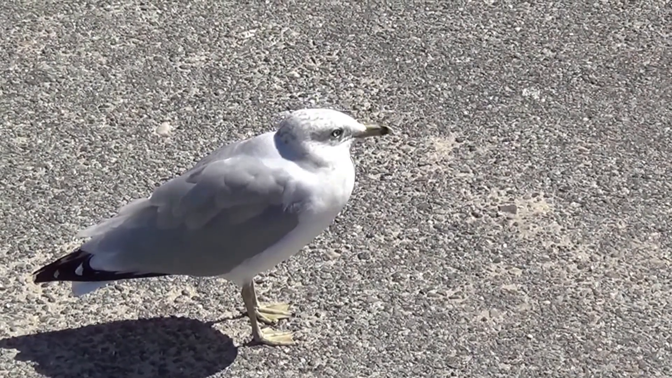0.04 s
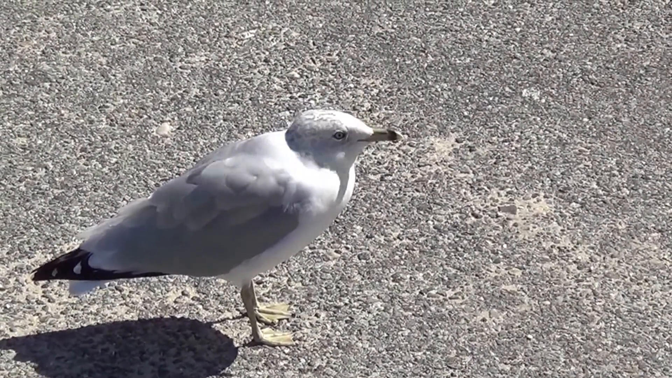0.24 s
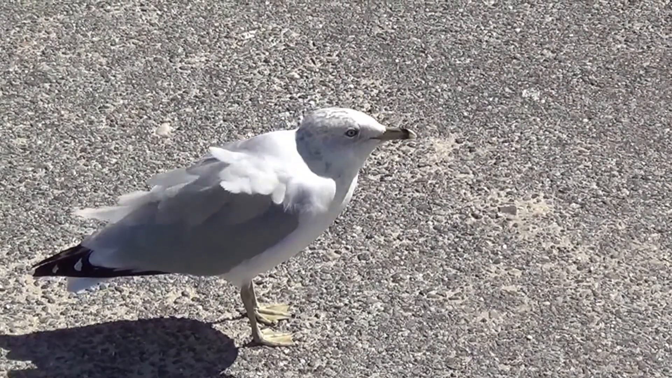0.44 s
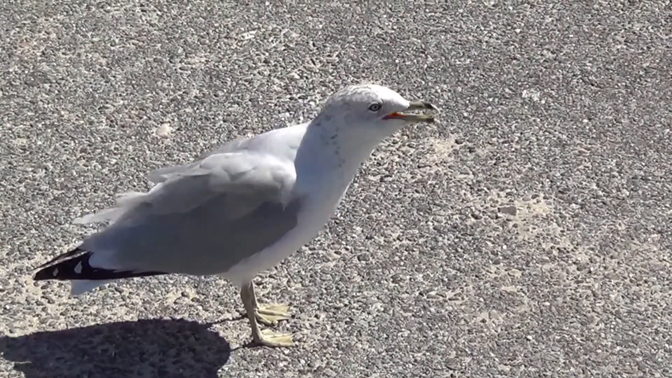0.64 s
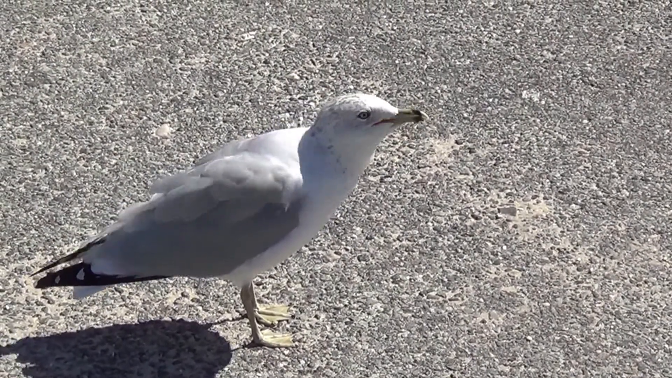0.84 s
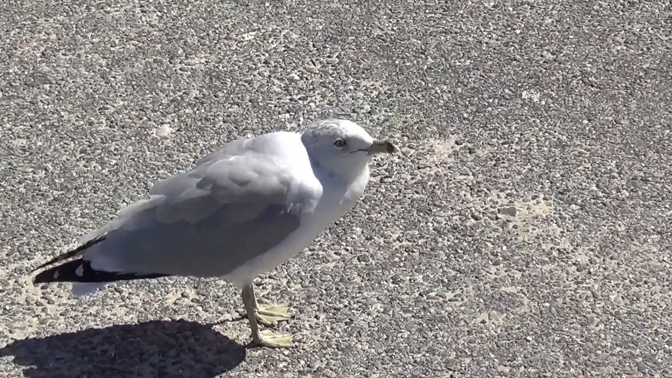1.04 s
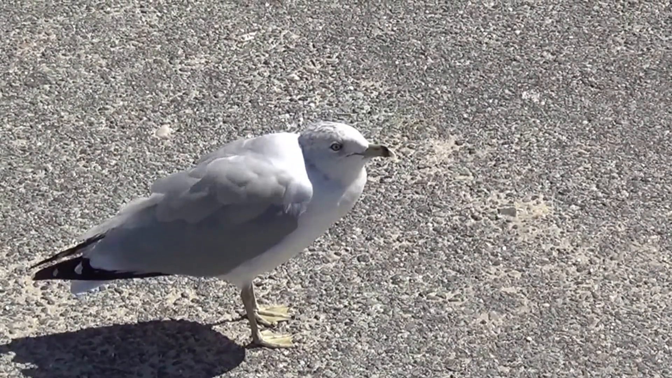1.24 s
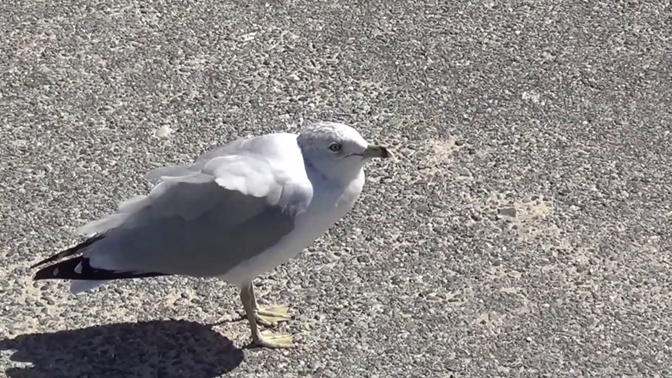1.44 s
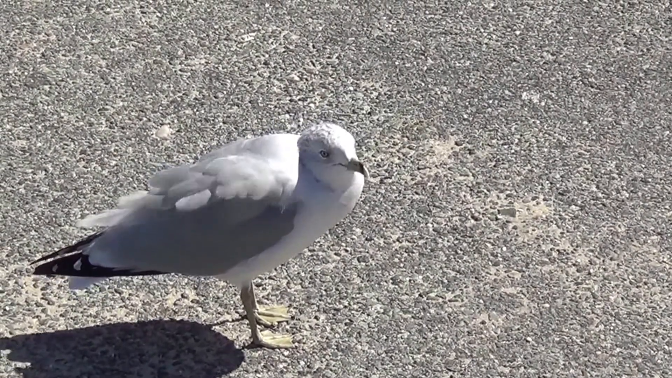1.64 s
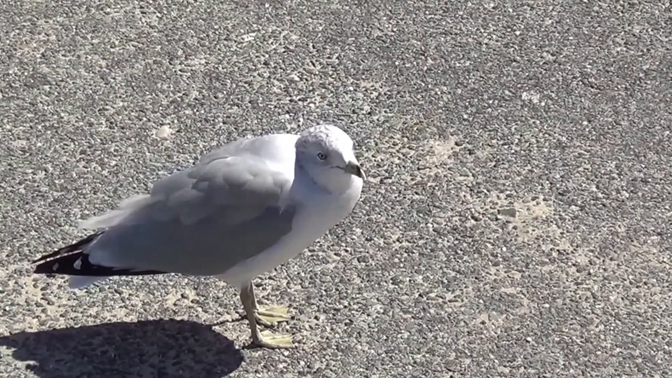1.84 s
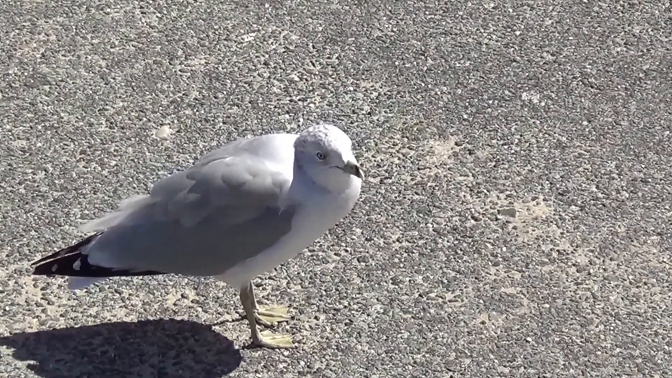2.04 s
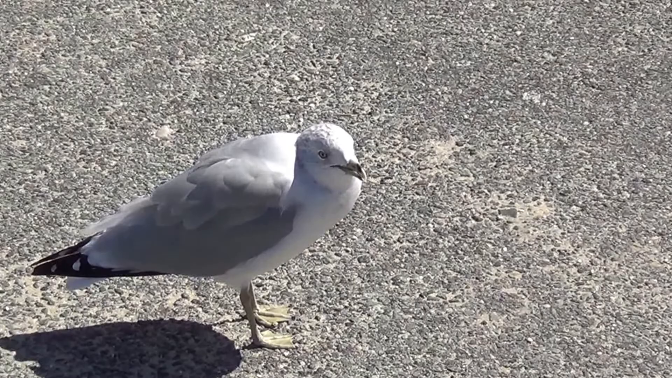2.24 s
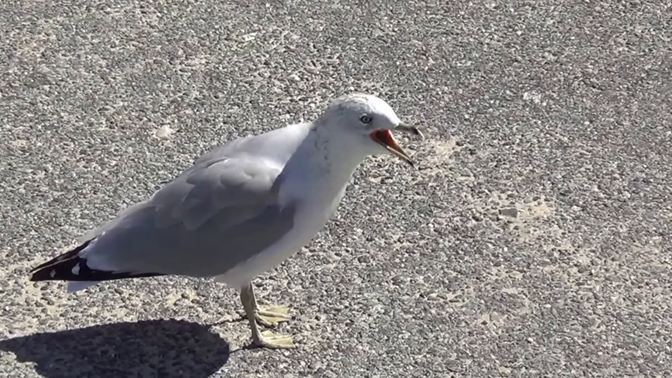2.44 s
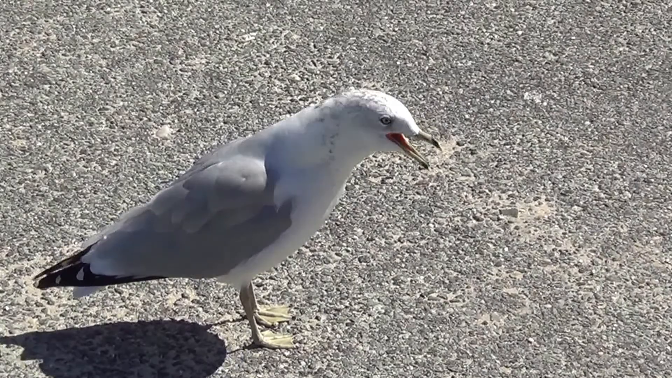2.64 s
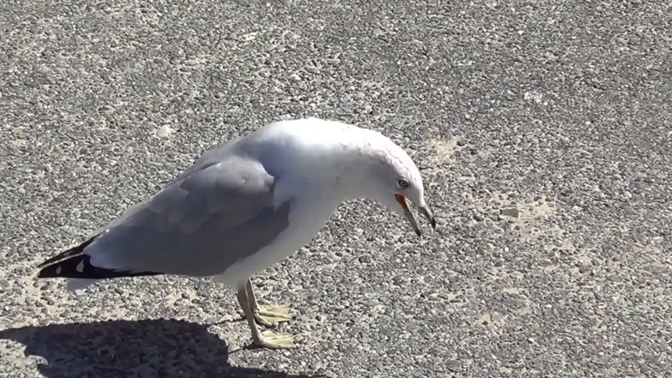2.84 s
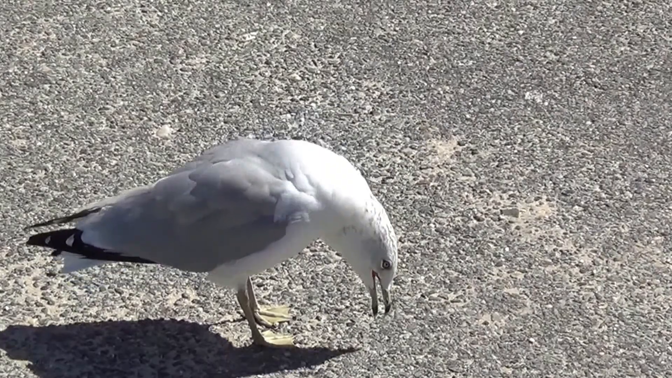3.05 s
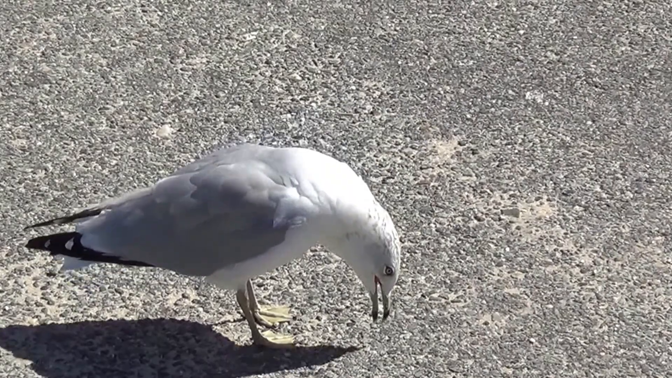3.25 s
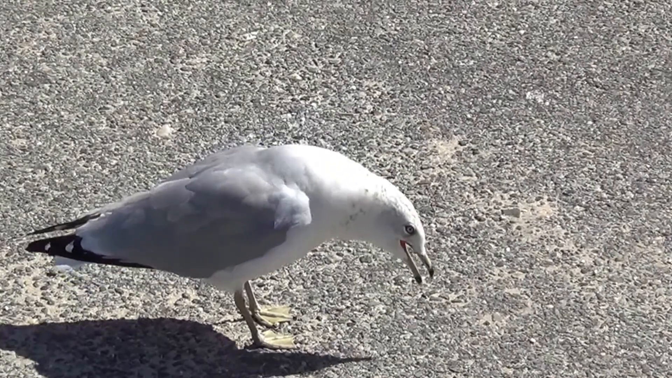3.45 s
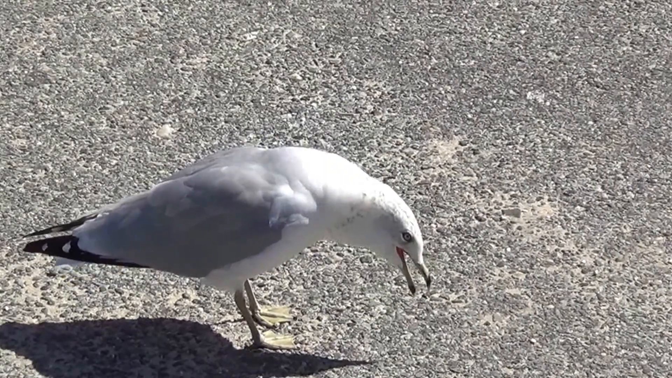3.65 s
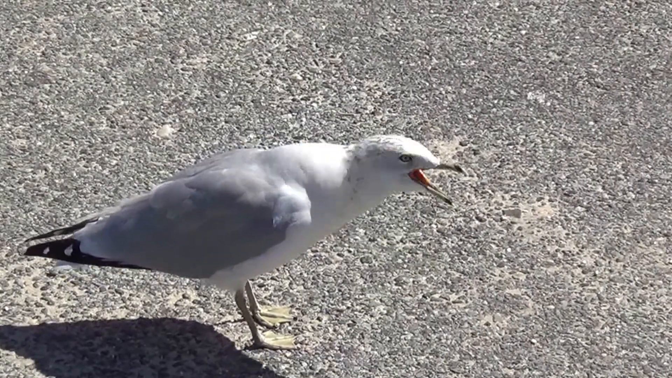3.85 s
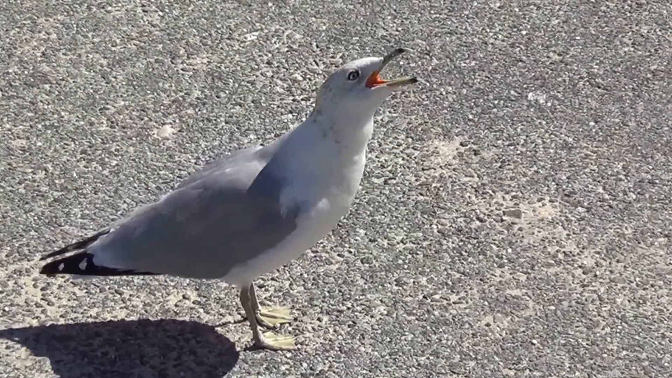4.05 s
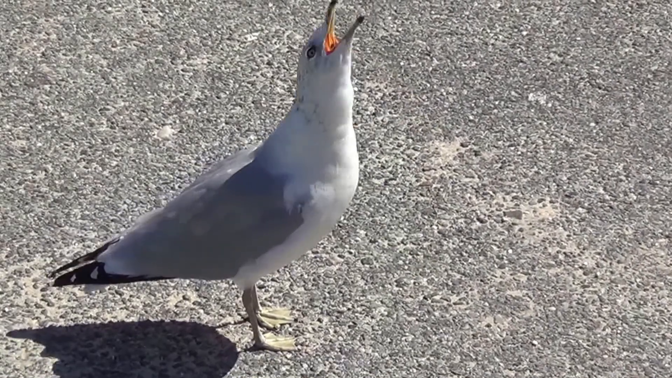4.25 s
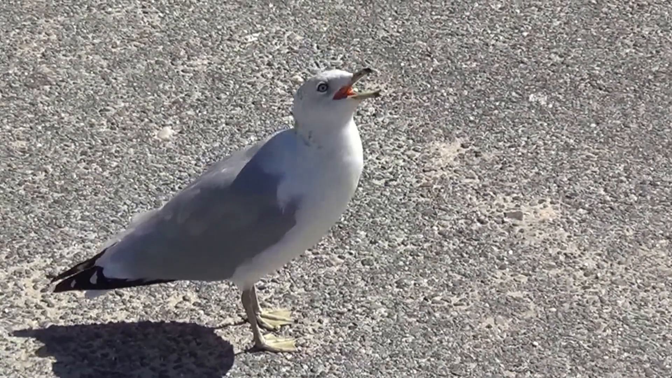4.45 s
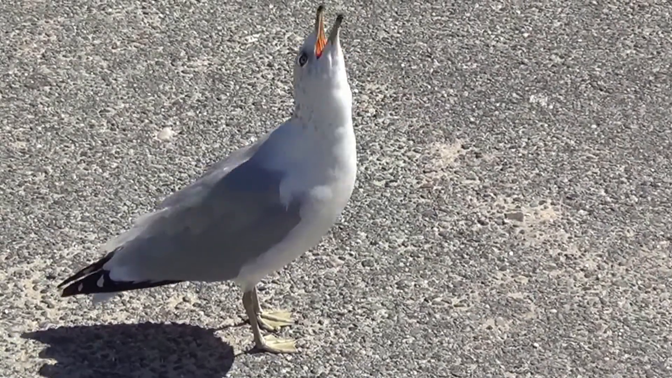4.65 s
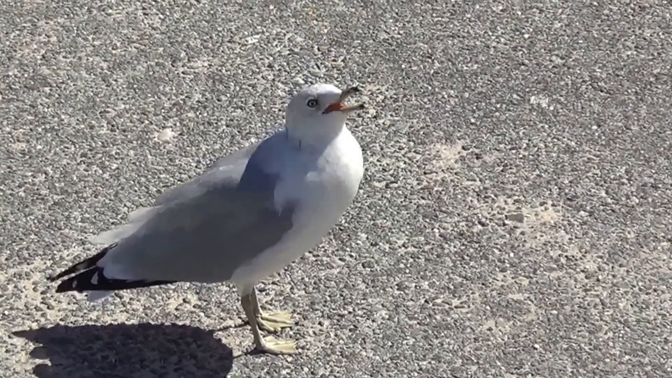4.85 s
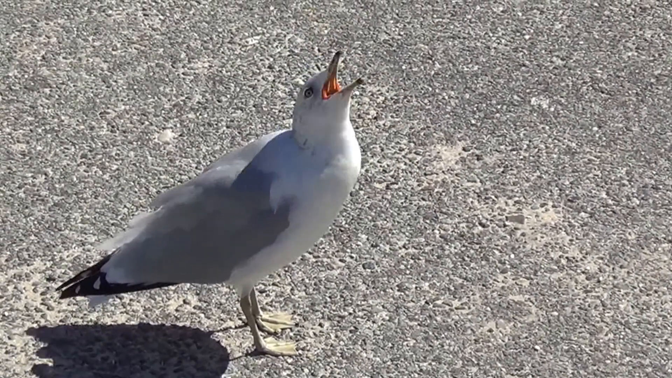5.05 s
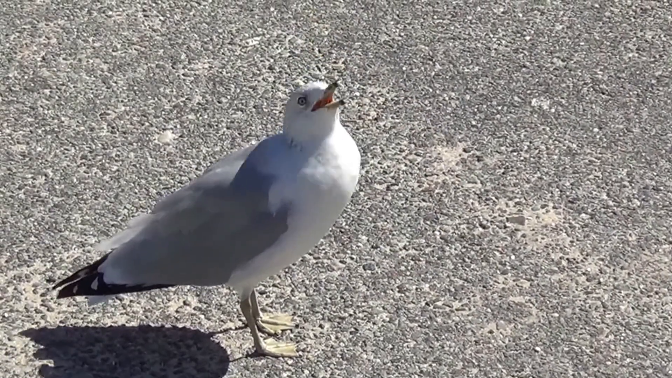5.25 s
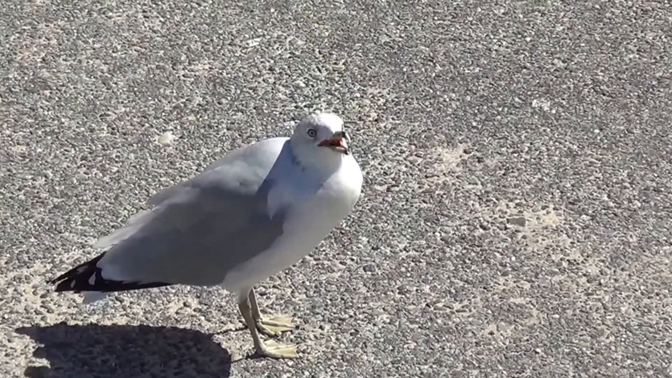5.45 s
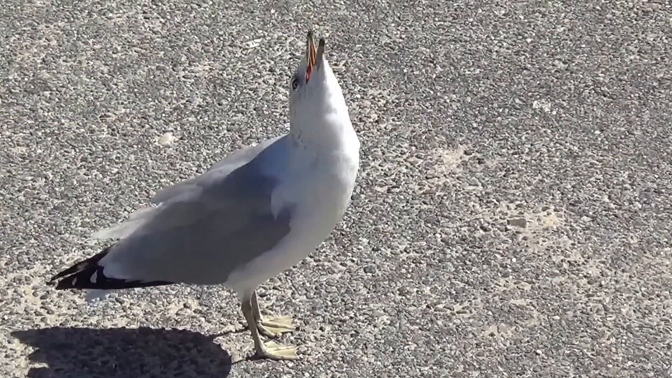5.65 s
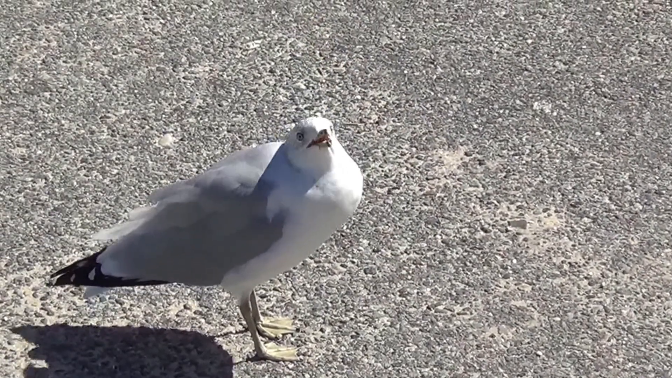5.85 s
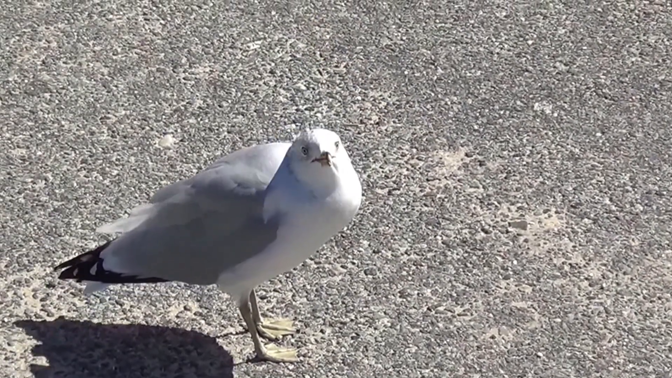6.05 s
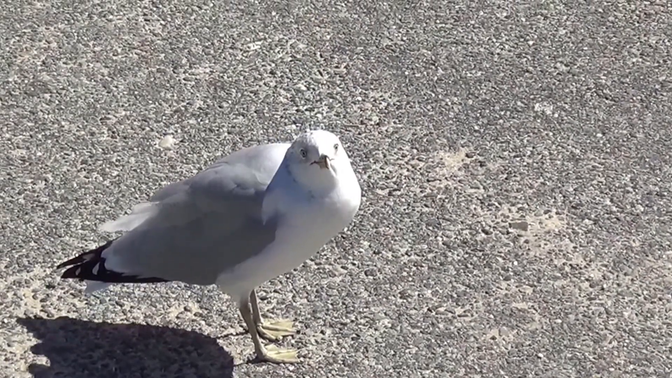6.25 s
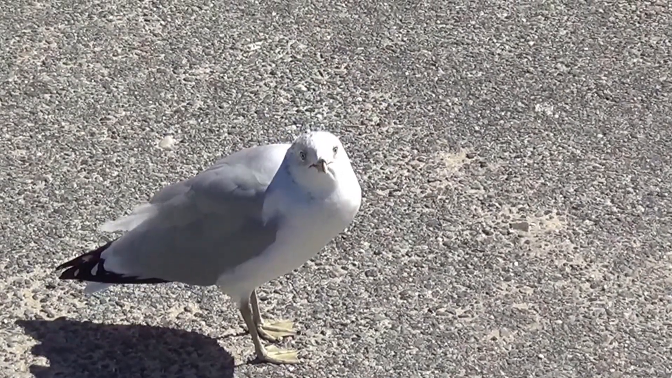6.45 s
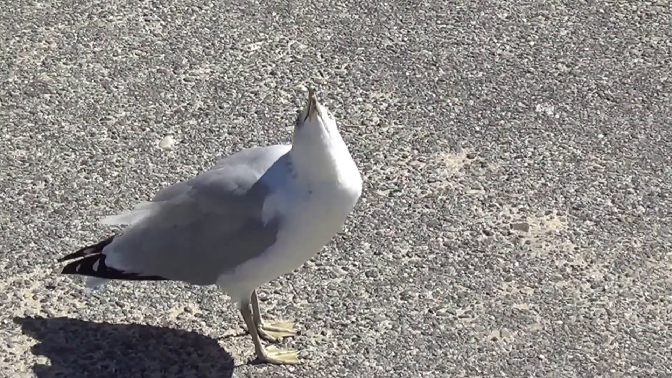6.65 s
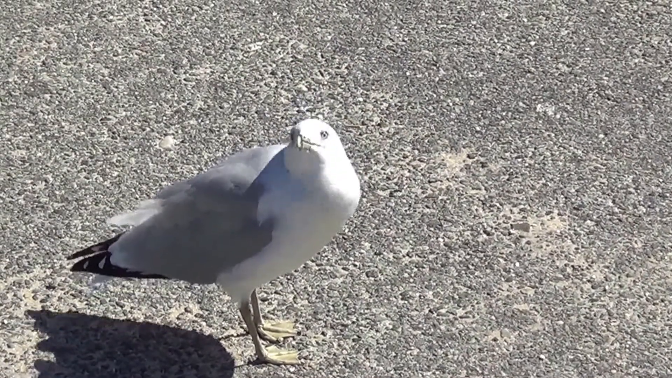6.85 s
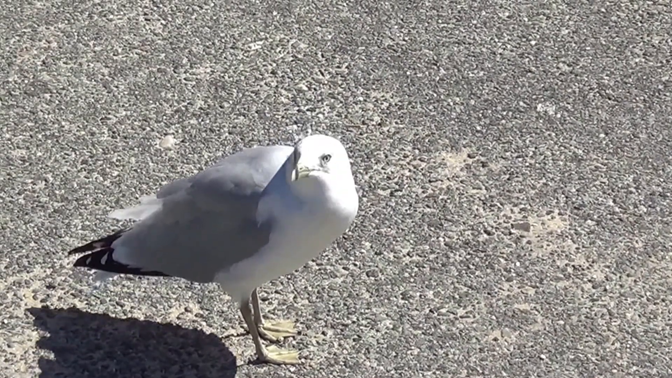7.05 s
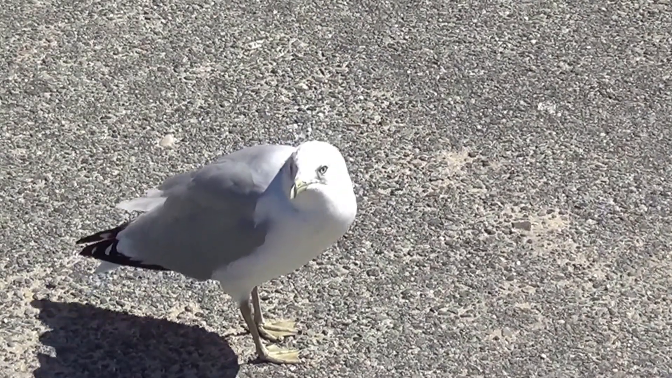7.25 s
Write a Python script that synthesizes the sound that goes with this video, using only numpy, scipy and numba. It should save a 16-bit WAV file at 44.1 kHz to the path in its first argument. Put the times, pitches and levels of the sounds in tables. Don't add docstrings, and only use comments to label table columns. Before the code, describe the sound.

Wind thumps softly at the start and a small bird whistles faintly. A nearby gull gives a single harsh, falling cry, waits, then calls again and again, nasal and piercing, its pitch jumping between registers with gritty edges. The calls space out and end on a thinner squeal. Dry open ground, a slight hard-surface reflection, distant water hiss and a barely audible high whine; stereo pickup.

```python
import sys
import numpy as np
from scipy import signal
from scipy.io import wavfile
from scipy.ndimage import uniform_filter1d
from numba import njit

SR = 44100
rng = np.random.default_rng(int(sys.argv[2]) if len(sys.argv) > 2 else 0)


def elevation(decibels):
    levels = np.asarray(decibels, float)
    return 10 ** (levels / 20)


def store_pcm(level_fs):
    pcm = np.round(np.clip(level_fs, -1, 1) * 32767).astype(np.int16)
    wavfile.write(sys.argv[1], SR, np.atleast_2d(pcm).T)


N = 322371
T = np.arange(N) / SR

# pitch_hz, level_db (per Hz)
SURF_SPECTRUM = [(88, -30), (150, -14), (309, -5), (790, -8.5), (1600, -15), (2700, -28.5), (2920, -22.5),
                 (14200, -28.5), (16000, -27.5)]
# time_s, level_db
GUSTS = [(0.0, -43.5), (0.04, -39), (0.24, -57.5), (1.0, -67.5), (1.08, -51), (1.2, -64.5), (2.38, -57),
         (2.83, -68.5), (3.01, -63.5), (5.93, -67.5), (6.0, -55.5), (6.2, -63.5), (7.02, -67), (7.31, -58)]
# start_s, length_s, from_hz, to_hz, level_db
CHIRPS = [
    (0.012, .03, 9744, 11136, -60),
    (0.032, .068, 4210, 3570, -47),
    (2.259, .03, 10000, 11207, -58),
    (2.279, .072, 4010, 3510, -47),
    (2.356, .02, 4200, 4300, -58),
]
# time_s, pitch_hz, level_db
WARBLE = [(0.09, 4420, -49.5), (0.15, 4340, -56.5), (0.2, 4800, -60.5), (0.262, 4945, -54.5),
          (0.297, 4770, -82.5)]

# start_s, length_s, level_db, pulse_rate_hz, throat_hz
HARSH = [
    (0.579, 0.074, -14.5, 549.4, 1684),
    (2.378, .082, -18, 475.5, 1850),
    (3.038, 0.04, -21, 501.4, 1420),
    (3.569, .041, -13, 461.2, 1800),
    (5.072, .062, -15, 407, 2017),
    (5.593, .058, -17, 474.2, 1753),
    (6.611, .065, -23, 498, 1530),
]
# start_s, length_s, level_db, pulse_rate_hz, throat_hz
PURR = [
    (2.458, .039, -19, 532, 1632),
    (3.918, 0.081, -14.5, 367, 1737),
    (4.249, 0.059, -13, 363.8, 1870),
    (4.306, 0.081, -15.5, 387, 2000),
    (4.647, .065, -13, 380, 1917),
]
# start_s, length_s, level_db, pulse_rate_hz, throat_hz
CROAK = [(0.897, .075, -23, 588, 1280), (2.699, 0.037, -19.5, 426.5, 1480), (3.335, 0.074, -17, 435, 1510),
         (3.858, .04, -11, 428, 1638), (4.11, .055, -9.5, 455.4, 1555), (4.47, 0.041, -10.5, 376.4, 1445),
         (4.882, 0.044, -12, 368.2, 1559), (5.33, 0.041, -11, 495.4, 1580), (5.855, 0.051, -14, 511, 1635),
         (6.712, 0.026, -18, 518, 1743)]
# peak (share of length), then db, pharynx_db, gape_db at start, peak and end
HARSH_SHAPE = dict(peak=.6, db=(-4, 1, -9.5), pharynx_db=(-7.5, -0.5, -1.5), gape_db=(-11, -1.5, -0.5))
PURR_SHAPE = dict(peak=.25, db=(0, 1, -1), pharynx_db=(-8.5, -11, -24.5), gape_db=(-8.5, -11, -11.5))
CROAK_SHAPE = dict(peak=.25, db=(-0.5, 0, -38), pharynx_db=(-3, -7.5, -25), gape_db=(-13, -16, -24))
RATE_SHARE = (.93, 1, .97), (.97, 1, 1.03), (1.02, 1, .96)
ROUGHNESS = .55, .3, .8
# time_s, treble_db
FACING = [(0.6, -8.5), (0.72, -6), (0.9, 0), (2.4, 0), (2.6, -3), (3.1, -5), (3.22, 3.5), (3.62, -8.5),
          (3.74, 1.5), (4.05, -3.5), (4.72, -2.5), (4.86, -2.5), (5.18, -4), (5.62, 1), (5.72, -6.5),
          (5.82, -4), (6.65, 2.5), (6.76, 12.5), (6.9, 5)]

# time_s, pitch_hz, level_db, gape_db (2nd over 1st partial)
LEAD_IN = [
    [(0.605, 2295, -28, -4), (0.659, 2191, -12.5, 13.5), (0.69, 2134, -12, 14), (0.727, 2111, -13, 19),
     (0.748, 2025, -9, 19), (0.772, 1900, -22, 7.5), (0.8, 1893, -22, 2), (0.877, 1800, -29, -9.5),
     (0.905, 1804, -27.5, -22)],
    [(2.498, 2001, -13, 10.5), (2.562, 2076, -10, 17.5), (2.59, 2108, -11, 3.5), (2.612, 2108, -10.5, 10.5),
     (2.645, 2035, -10.5, 16.5), (2.675, 1891, -13, 17), (2.697, 1744, -19, -27), (2.712, 1711, -52.5, -29)],
    [(3.06, 1938, -20.5, 3.5), (3.088, 1973, -12.5, 9.5), (3.137, 2173, -14.5, -11.5)],
    [(3.147, 2962, -21.5, 0.5), (3.17, 2962, -22.5, -1), (3.303, 2939, -16, -7.5),
     (3.341, 2800, -23, -26.5)],
    [(3.349, 1802, -30.5, 13.5), (3.361, 1808, -38.5, -7.5), (3.375, 1706, -43.5, -9)],
]
# time_s, pitch_hz, level_db, gape_db
HEAD_TOSS = [
    [(3.6, 1860, -14.5, 17), (3.66, 2119, -13.5, -1), (3.67, 2103, -12.5, 6.5)],
    [(3.68, 2959, -14.5, -14), (3.74, 2926, -12.5, -15), (3.792, 2900, -11, -12), (3.835, 2777, -13, -9)],
    [(3.845, 1866, -14, -4.5), (3.859, 1678, -26, -5), (3.87, 1627, -48, -14.5)],
    [(3.993, 1825, -21.5, 15.5), (4.055, 1929, -13, -5), (4.075, 1880, -14.5, 2.5), (4.097, 1825, -12.5, 9),
     (4.12, 1720, -23.5, 4)],
    [(4.382, 1332, -25.5, 26), (4.394, 1327, -29.5, 43), (4.406, 1305, -15.5, 11)],
    [(4.414, 1785, -14, -15.5), (4.434, 1889, -8.5, -7), (4.472, 1797, -16.5, 3)],
    [(4.71, 1856, -18.5, -24), (4.728, 1942, -12.5, -14), (4.778, 2048, -13.5, -5.5)],
    [(4.785, 1360, -18, 25), (4.797, 1374, -21.5, 17), (4.808, 1338, -17, 14)],
    [(4.814, 1885, -15, -9.5), (4.85, 1902, -13, -6.5), (4.885, 1896, -18, 9.5)],
]
# time_s, pitch_hz, level_db, gape_db
RUN_OUT = [
    [(5.135, 1908, -15.5, -15), (5.175, 1983, -13.5, -14), (5.213, 2022, -9, -3.5), (5.262, 1930, -15, -13),
     (5.291, 1986, -12, -2), (5.332, 1960, -19, 5.5)],
    [(5.608, 1845, -24, 5), (5.63, 1850, -25, 10.5), (5.648, 1700, -18, -15), (5.671, 1492, -13, -23),
     (5.688, 1517, -15, -9)],
    [(5.695, 2015, -12.5, -33), (5.721, 1979, -6.5, -20.5), (5.77, 2030, -17, -1), (5.802, 2064, -11, 4),
     (5.858, 2004, -18.5, -1)],
    [(6.636, 1930, -26, 2), (6.682, 1878, -24, 11.5), (6.698, 1671, -14, -21.5), (6.717, 1534, -22, -34)],
    [(6.724, 1976, -18.5, -15), (6.788, 2036, -17, -19), (6.82, 2105, -20, -4), (6.86, 2170, -26, 14),
     (6.9, 2130, -23, 6), (6.938, 2068, -23, -5.5), (6.962, 1892, -54, -6)],
]
# time_s, pitch_hz, level_db, gape_db
TORN = [
    [(2.402, 2015, -25.5, -11), (2.43, 1947, -24.5, -10), (2.458, 1846, -19.5, -10.5)],
    [(2.464, 1072, -20, 22), (2.48, 1082, -15, 22.5), (2.494, 1073, -18.5, 23)],
]
# start_s, end_s, depth_db, lean_db (3rd over 5th half line)
SPLITS = [(0.595, 0.68, -6.5, -0.5), (0.76, 0.95, -11.5, 6.5), (2.37, 2.455, 3, -3), (2.445, 2.509, 4, 7),
          (2.679, 2.72, 2.5, 8), (4.074, 4.14, -3.5, -7), (4.36, 4.41, -6, 4), (4.401, 4.494, -10.5, -8),
          (4.772, 4.829, -8, 3.5), (4.813, 4.908, -3, -5), (5.25, 5.364, -9.5, -7),
          (5.586, 5.706, -3.5, 2.5), (5.767, 5.879, -7.5, -6.5), (6.623, 6.717, 1.5, 8.5)]
# pitch_hz, level_db (under the squeal)
TRACT = [(600, -43.5), (950, -21), (2800, -3.5), (4800, -7), (6000, -16), (8000, -21.5), (12000, -23),
         (15500, -36)]


def unit(x):
    return x / np.sqrt(np.mean(x ** 2))


def walk(rate, size):
    k = max(int(SR / rate), 2)
    steps = np.repeat(rng.standard_normal(size // k + 1), k)
    return 1.3 * uniform_filter1d(uniform_filter1d(steps, k), k)[:size]


@njit
def svf(x, hz, width):
    y, b, l = np.empty(len(x)), 0., 0.
    for i in range(len(x)):
        g, k = np.tan(np.pi * hz[i] / SR), width / hz[i]
        v = (b + g * (x[i] - l)) / (1 + g * (g + k))
        b, l, y[i] = 2 * v - b, l + 2 * g * v, k * v
    return y


def band(x, hz, width):
    hz = np.broadcast_to(hz, len(x)) * 1.
    return svf(svf(x, hz, 0.95 * width), hz, 0.95 * width)


def surf():
    out, swell = 0, walk(0.33, N)
    hz_at, db_at = np.transpose(SURF_SPECTRUM)
    for hz in 45 * 2 ** np.arange(0, 8.6, .5):
        mid, side = (svf(rng.standard_normal(N), np.full(N, hz), hz / 3) for _ in range(2))
        db = np.interp(np.log(hz), np.log(hz_at), db_at) + 0.36 * swell + 1.8 * walk(24, N)
        width = np.interp(np.log(hz), np.log([100, 700, 2400, 5000, 14000]), [0.25, 0.69, .7, 0.52, .05])
        out = out + elevation(db) * (hz > 200) * (mid + width * side * np.array([[1], [-1]]))
    return unit(out) * elevation(-52.5)


def wind():
    mid, side = (unit(band(rng.standard_normal(N), 110., 190.) * elevation(3.0 * walk(40, N))) for _ in range(2))
    gust_db = np.interp(T, *np.transpose(GUSTS))
    apart = np.clip(.3 + .012 * (gust_db + 61.5), .1, 1)
    return elevation(gust_db + 5.5) * (mid + apart * side * np.array([[1], [-1]]))


def whine():
    return np.sqrt(2) * elevation(-72) * np.sin(2 * np.pi * 15734 * T)


def sections(tables, edge=.006):
    for rows in tables:
        s, *columns = np.transpose(rows)
        cut = slice(int((s[0] - edge) * SR), int((s[-1] + edge) * SR))
        t = T[cut]
        fade = np.clip(np.minimum(t - t[0], t[-1] - t) / (.6 * edge), 0, 1)
        rounding = min(len(t) // 6, 700)
        yield cut, [uniform_filter1d(np.interp(t, s, c), size=rounding, mode="nearest") for c in columns], fade


def partials(phase, levels_db, shimmer_db=1.7):
    top = 15900 * 2 * np.pi / SR / np.gradient(phase)
    out = 0
    for k, db in levels_db.items():
        level = np.sqrt(2) * elevation(db + shimmer_db * walk(100.6, len(phase)))
        out = out + level * np.clip(12 * (1 - k / top), 0, 1) * np.sin(k * phase + .9 * k * k)
    return out


def small_bird():
    out = np.zeros(N)
    notes = []
    for s, length, from_hz, to_hz, db in CHIRPS:
        bend_hz = from_hz + 0.87 * (to_hz - from_hz)
        notes.append([(s, from_hz, db - 2.5), (s + .5 * length, bend_hz, db), (s + length, to_hz, db - 8.5)])
    for cut, (hz, first_db), fade in sections(notes + [WARBLE]):
        phase = 2 * np.pi * np.cumsum(hz * (1 + .004 * walk(160, len(hz)))) / SR
        strain_db = first_db - 3.5 + 0.65 * (first_db + 44)
        upper_db = {k: strain_db - 6.9 * (k - 2) for k in (2, 3)}
        out[cut] += fade * partials(phase, {1: first_db, **upper_db}, shimmer_db=5.0)
    return out


def facing_db():
    return np.interp(T, *np.transpose(FACING))


def rasp_plan():
    shapes = HARSH_SHAPE, PURR_SHAPE, CROAK_SHAPE
    for rows, shape, share, rough in zip((HARSH, PURR, CROAK), shapes, RATE_SHARE, ROUGHNESS):
        for s, length, db, hz, throat_hz in rows:
            times = s + length * np.array([0, shape["peak"], 1])
            rates, levels = hz * np.array(share), db + np.array(shape["db"])
            table = np.transpose([times, rates, levels, shape["pharynx_db"], shape["gape_db"]])
            yield table, rough, throat_hz


def rasp():
    out = np.zeros(N)
    facing = facing_db()
    tables, roughs, throats = zip(*rasp_plan())
    plan = zip(sections(tables, edge=.003), roughs, throats)
    for (cut, (hz, db, pharynx_db, gape_db), fade), rough, throat_hz in plan:
        size = len(hz)
        cycle = np.cumsum(hz * (1 + .06 * rough * walk(200, size))) / SR
        strength = elevation(1.4 * rough * rng.standard_normal(size=200))[cycle.astype(int)]
        pulses = 0
        for k in range(1, 36):
            level = elevation(5 * walk(45, size) - 8 * (k < 4))
            pulses = pulses + level * np.cos(2 * np.pi * k * cycle + .05 * k * k)
        air = np.exp(-(cycle % 1) / 0.3) * rng.standard_normal(size)
        drive = unit(strength * pulses) + (.12 + .36 * rough) * unit(air)

        def ring(centre_hz, width):
            flicker = elevation(1.5 * walk(50, size))
            return flicker * unit(band(drive, centre_hz * (1 + .03 * walk(30, size)), width))

        voice = ring(throat_hz, 880.0)
        voice += elevation(pharynx_db + .5 * facing[cut]) * ring(2476.0, 890.0)
        voice += elevation(-36.5) * ring(500.0, 240.0)
        nearest = round(throat_hz / np.median(hz))
        voice += elevation(-3.0) * (1 - rough) ** 2.0 * np.cos(2 * np.pi * nearest * cycle)
        upper = elevation(-10.5) * ring(7700., 3000.0) + elevation(-16.5) * ring(11000., 2600.0)
        upper = upper * elevation(-60.0 * np.arange(size) / SR)
        gape_hz = 4920 * (0.824 if rough < ROUGHNESS[0] else 1) * np.linspace(1, .86, size)
        bill = elevation(gape_db + 0.86 * facing[cut]) * (ring(gape_hz, 820.0) + upper)
        swell = 1 - np.exp(-np.arange(size) / (.011 * SR))
        out[cut] += fade * swell * elevation(db) * (voice + bill)
    return out


def squeal():
    out, layers, split, lean_db = np.zeros(N), np.zeros(N), np.full(N, 1e-4), np.zeros(N)
    facing = facing_db()
    tract_hz, tract_db = np.transpose(TRACT)
    for start, end, db, lean in SPLITS:
        lean_db[int(start * SR):] = lean
        split += elevation(db) * np.clip(np.minimum(T - start, end - T) / 0.057, 0, 1)
    for cut, (hz, db, gape_db), fade in sections(LEAD_IN + HEAD_TOSS + RUN_OUT + TORN):
        layers[cut] += fade
        t = T[cut]
        jolt = np.exp(-np.minimum(t - t[0], t[-1] - t) / 0.0097) + 0.3 * split[cut]
        phase = np.pi * np.cumsum(hz * (1 + (.0015 + .015 * jolt) * walk(400, len(hz)))) / SR
        treble_db = facing[cut] - 12.5 * split[cut]
        levels_db = {}
        for k in range(1, 20):
            level = db + np.interp(np.log(k * hz / 2), np.log(tract_hz), tract_db)
            level = level + k % 2 * 20 * np.log10(split[cut]) + (k > 5) * treble_db
            level = level + ((k == 3) - (k == 5)) * lean_db[cut]
            levels_db[k] = level + 3.5 * walk(15, len(hz))
        levels_db[2] = db - 10 * np.log10(1 + elevation(2 * gape_db))
        levels_db[4] = levels_db[2] + gape_db
        out[cut] += fade * partials(phase, levels_db)
    return out / np.maximum(layers, 1)


def open_ground(x):
    t = T[:SR]
    scatter = elevation(-33) * 10 ** (-3 * t / 0.091) * (t > .004)
    scatter += elevation(-61.5) * 10 ** (-3 * t / 0.56) * (t > .03)
    mid, side = scatter * signal.lfilter(*signal.butter(2, 3800, fs=SR), rng.standard_normal((2, SR)))
    mid[0], side[0] = 1, -.1
    mid[int(.0021 * SR)] += elevation(-23)
    mid[int(.0108 * SR)] += elevation(-14)
    side[int(.0004 * SR)] += elevation(-28)
    side = signal.lfilter(*signal.butter(1, 4000, fs=SR), side)
    return np.array([signal.fftconvolve(x, h)[:N] for h in (mid + side, mid - side)])


def scene():
    background = surf() + wind() + whine()
    birds = small_bird() + rasp() + squeal()
    return open_ground(birds) + background


def band_limit(x):
    return signal.sosfilt(signal.butter(12, 16480, fs=SR, output="sos"), x)


def record(dry):
    rounded = .63 * np.tanh(dry / .63)
    no_rumble = signal.lfilter(*signal.butter(3, 52, "high", fs=SR), rounded)
    mix = signal.sosfilt(signal.ellip(8, .2, 60, 15950, fs=SR, output="sos"), no_rumble)
    return band_limit(mix)


dry = scene()
out = record(dry)
store_pcm(out)
```